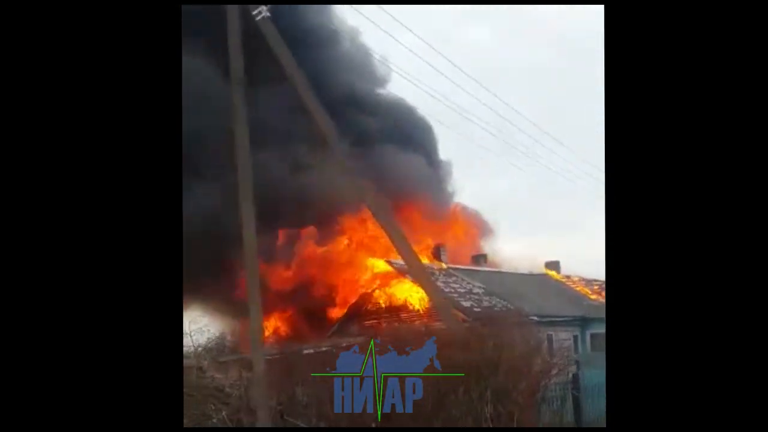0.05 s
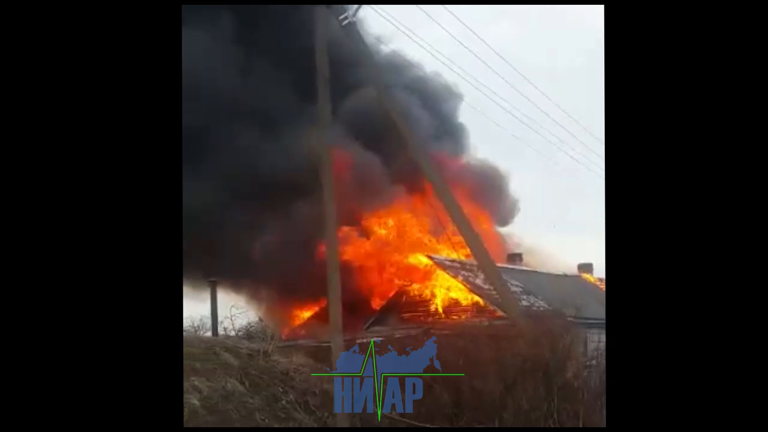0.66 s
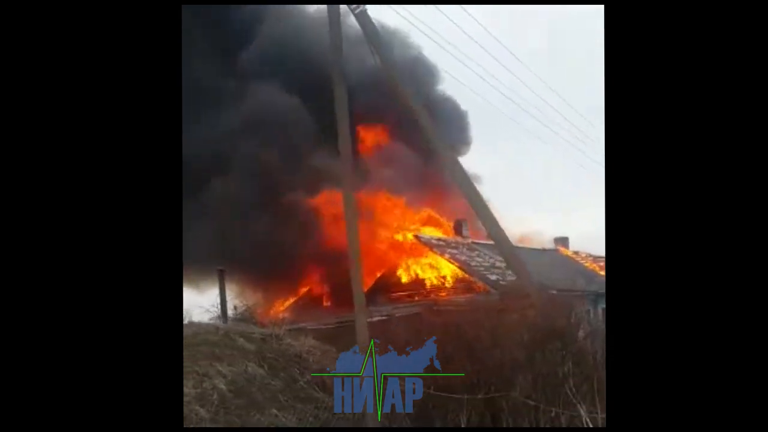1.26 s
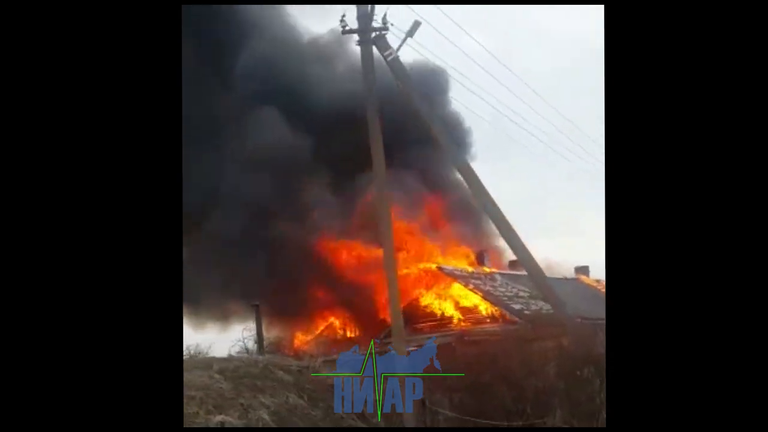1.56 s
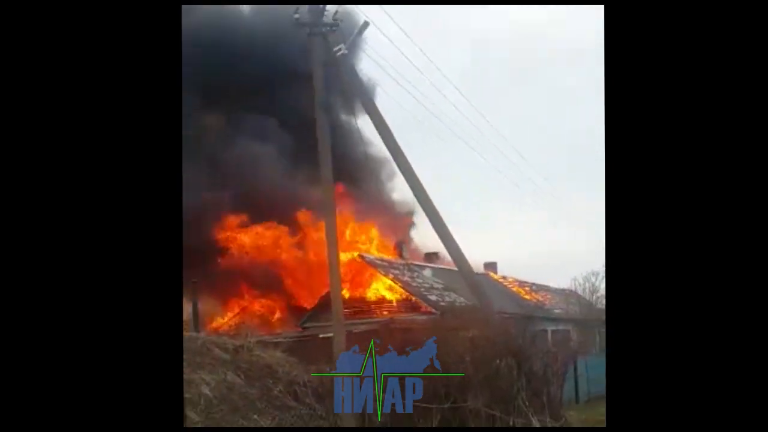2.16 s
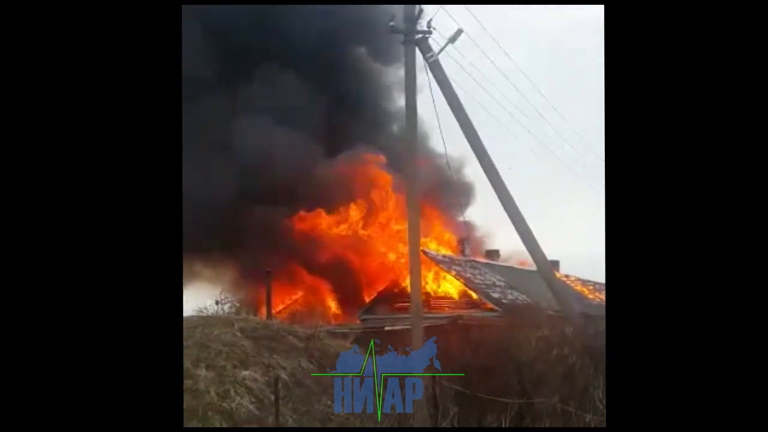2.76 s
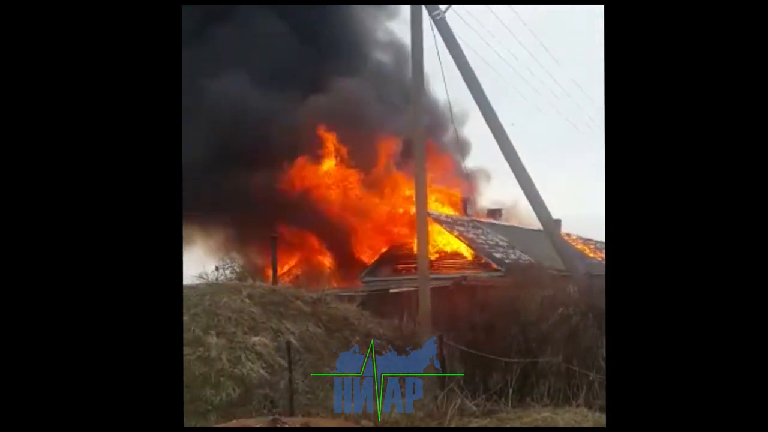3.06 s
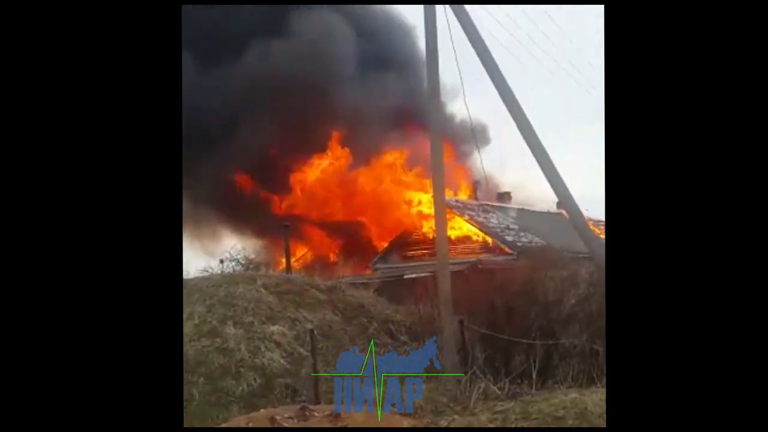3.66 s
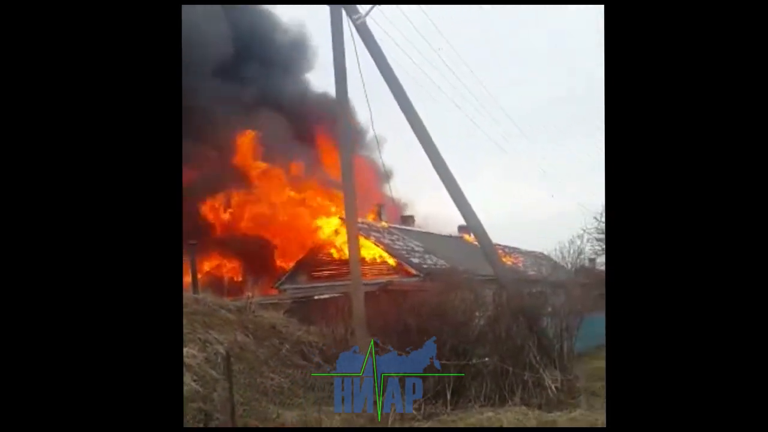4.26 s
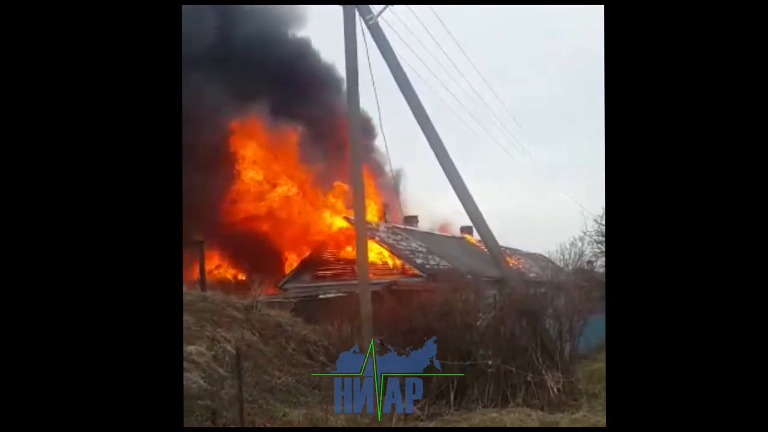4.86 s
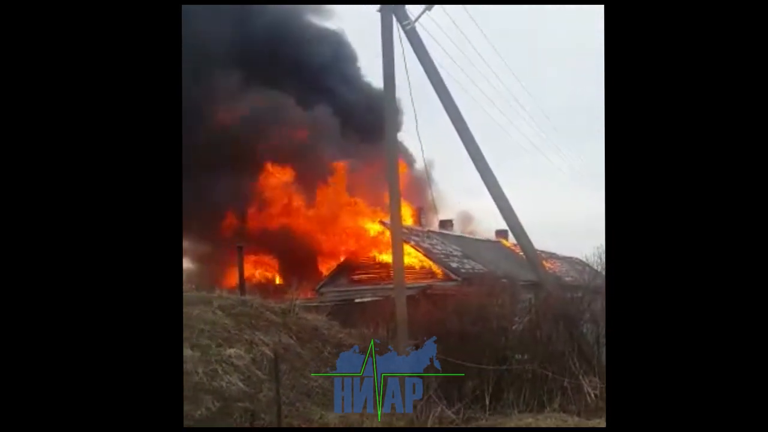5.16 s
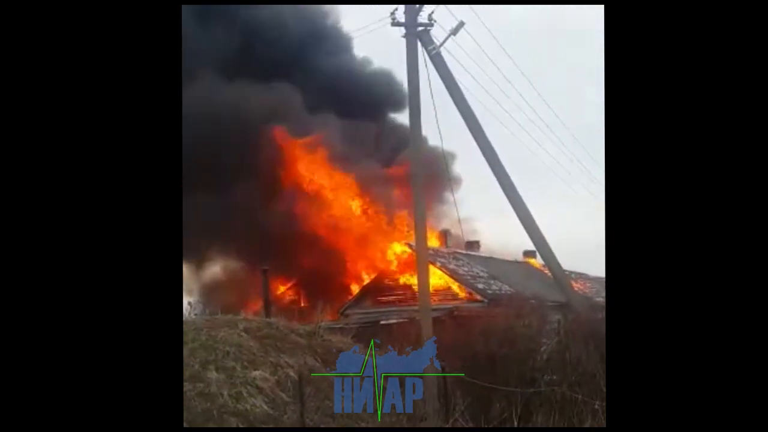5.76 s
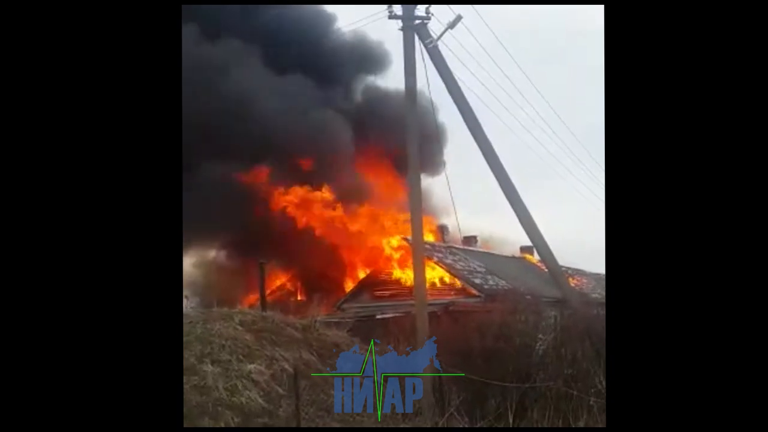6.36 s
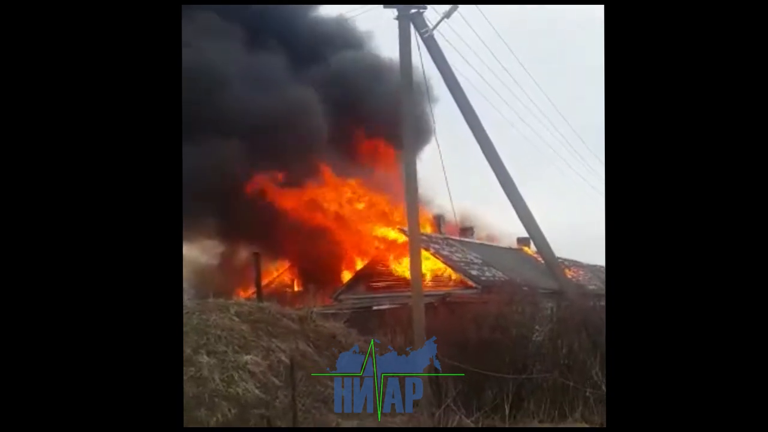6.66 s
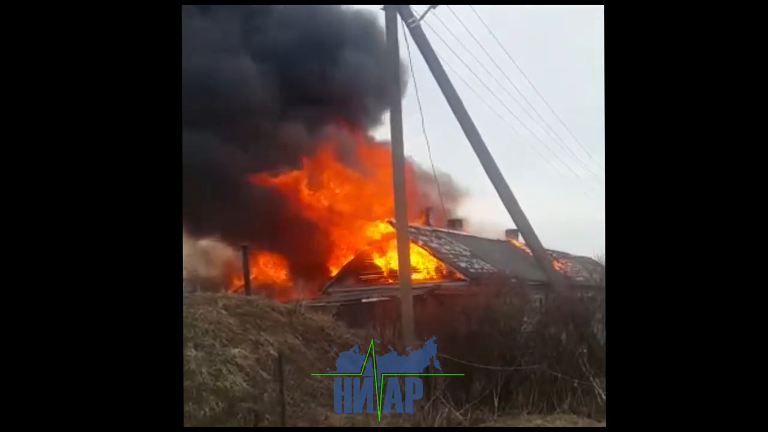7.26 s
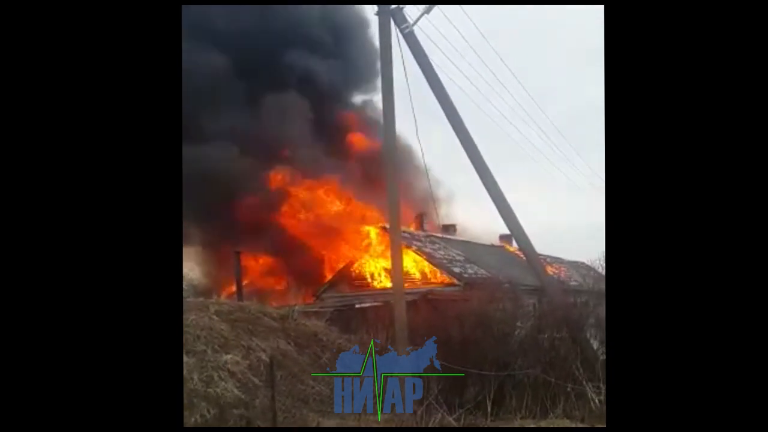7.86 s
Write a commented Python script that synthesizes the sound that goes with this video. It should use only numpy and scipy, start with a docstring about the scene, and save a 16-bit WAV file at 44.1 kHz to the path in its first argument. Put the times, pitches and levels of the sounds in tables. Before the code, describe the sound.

Irregular woody pops and sharp cracks come from a blazing house, picked up outdoors by a handheld microphone at a distance. Beneath them run constant small crackles, sizzling ticks and a soft rumble with brief puffs of air. The pops bunch into quick volleys, thin out for a moment, then return near the end with stronger hiss and a surge of flame. The yard scatters a brief echo.

```python
"""Wooden house on fire

Outdoors, some way off from a fierce blaze. Roof sheets and timbers burst with sharp, hollow pops,
splinters snap, sap spits, and crackle and hiss flare up and die away over the low roar of turbulent air.
The yard scatters each pop; a handheld camera hears it through two unlike microphone ports."""
import sys
import numpy as np
from scipy import signal
from scipy.fft import rfft, irfft, next_fast_len
from scipy.io import wavfile
from scipy.ndimage import map_coordinates

SR = 44100
rng = np.random.default_rng(int(sys.argv[2]) if len(sys.argv) > 2 else 0)


def store_wav(level_fs):
    """Save 16-bit WAV to argv[1]."""
    pcm = np.round(np.clip(np.atleast_2d(level_fs), -1, 1) * 32767)
    wavfile.write(sys.argv[1], SR, pcm.T.astype(np.int16))


N = 352800

# loud bursts of roof and timber: start_s, body_db, pitch_hz, crack_db
TIMBER_BURSTS = [(0.0491, -37, 1300, -32.5), (0.1403, -29, 786, -41), (0.1669, -19.5, 650, -36.5),
                 (0.1956, -24, 786, -29), (0.3647, -22, 1520, -25), (0.4431, -17, 710, -31),
                 (0.5344, -27, 1800, -42), (0.539, -28, 1520, -26), (0.5711, -16.5, 1020, -20.5),
                 (0.6135, -31, 1000, -41), (0.639, -27.5, 1230, -39), (0.6629, -20, 1040, -26),
                 (0.7286, -19.5, 810, -35), (0.7453, -25.5, 1130, -41), (0.8357, -26.5, 1300, -29),
                 (0.8732, -32, 1010, -63), (0.902, -36, 1170, -59), (0.9459, -37, 870, -35),
                 (1.1171, -35, 1460, -54), (1.2445, -37.5, 1810, -32.5), (1.5116, -17.5, 1230, -27),
                 (1.5176, -17.5, 860, -24.5), (1.5445, -33, 1020, -32), (1.5726, -19, 950, -34),
                 (1.5902, -22, 1270, -31.5), (1.6264, -19.5, 1180, -30), (1.7975, -25, 1260, -52),
                 (1.9092, -15.5, 750, -24.5), (1.9664, -30.5, 800, -31), (2.0799, -23.5, 1260, -25.5),
                 (2.126, -33, 1530, -25.5), (2.2926, -17, 1280, -27.5), (2.2959, -19.5, 980, -27.5),
                 (2.352, -24.5, 1120, -34.5), (2.4105, -30, 1620, -18.5), (2.4647, -22.5, 1330, -36.5),
                 (2.5777, -28, 1420, -35.5), (2.764, -16, 810, -22), (2.7715, -23, 860, -31),
                 (2.8181, -19, 960, -32), (2.9394, -23.5, 1070, -36.5), (3.0675, -36.5, 870, -61),
                 (3.139, -39, 690, -38), (3.2245, -26.5, 880, -29.5), (3.292, -24.5, 1340, -30),
                 (3.3083, -18.5, 635, -21), (3.343, -23.5, 790, -36), (3.362, -29.5, 845, -38),
                 (3.476, -24.5, 1010, -52), (3.5026, -23.5, 1580, -30), (3.5517, -28.5, 1420, -39),
                 (3.603, -34.5, 910, -49), (3.932, -27.5, 1140, -31.5), (4.1236, -18.5, 850, -25.5),
                 (4.1732, -28.5, 834, -52), (4.222, -28, 1090, -46.5), (4.4002, -16.5, 567, -21),
                 (4.4162, -25, 806, -48), (4.4725, -13, 720, -21.5), (4.5125, -22, 705, -29),
                 (4.5238, -17.5, 855, -34), (4.5529, -23, 900, -35), (4.5669, -24, 755, -36),
                 (4.5786, -20.5, 676, -31.5), (4.5979, -22.5, 960, -38), (4.6466, -19.5, 1060, -34),
                 (4.7745, -32.5, 910, -52), (4.8226, -22.5, 1550, -25.5), (4.99, -27, 1320, -34),
                 (5.008, -21.5, 1480, -20.5), (5.032, -24.5, 1290, -32), (5.0743, -25.5, 774, -25.5),
                 (5.1406, -24, 895, -36), (5.1813, -27, 1700, -39.5), (5.2624, -27.5, 2140, -22),
                 (5.3141, -29.5, 1430, -37), (5.4982, -23, 1410, -24), (5.55, -30, 1100, -46),
                 (5.6708, -31.5, 1340, -54), (5.74, -42, 1020, -30.5), (5.8026, -26.5, 1040, -52),
                 (5.9263, -26, 770, -34.5), (6.0473, -22, 560, -36), (6.2995, -50, 1930, -36),
                 (6.5396, -24, 2320, -33.5), (6.8645, -28, 1060, -36), (6.8767, -22.5, 850, -39),
                 (7.0312, -21.5, 1110, -57), (7.0911, -17.5, 1010, -24.5), (7.1977, -24.5, 1180, -21.5),
                 (7.222, -19.5, 1000, -32), (7.264, -29, 1370, -41), (7.3503, -27.5, 1420, -43),
                 (7.4105, -14.5, 547, -27), (7.5739, -14.5, 720, -22), (7.6241, -19, 920, -38),
                 (7.7488, -25.5, 1070, -33.5), (7.877, -32.5, 860, -47)]
# the clearest splinters, each ringing a little above its base: start_s, level_db, base_hz
SPLINTER_SNAPS = [(0.0886, -32, 5000), (1.061, -35, 4680), (1.262, -42, 6800), (1.2848, -39.5, 7350),
                  (1.8406, -26, 5680), (2.156, -28.5, 4870), (2.2146, -34, 4870), (2.2455, -30, 6620),
                  (2.8006, -32, 4000), (3.1834, -38, 5350), (3.206, -26, 6200), (3.726, -43, 5900),
                  (3.9216, -40.5, 5640), (4.277, -36, 4400), (4.848, -29.5, 5170), (6.3275, -41, 5860),
                  (7.1215, -26, 6310), (7.1474, -30.5, 4950), (7.2357, -30, 5050), (7.5239, -27, 4240),
                  (7.6723, -27.5, 6400), (7.7869, -35, 6080)]
# steady strength of the blaze, in relative levels: time_s, crackle_db, sizzle_db
STEADY_BLAZE = [(0.0, -38.5, -48.5), (0.18, -39.5, -45.5), (0.69, -42, -47.5), (1.2, -49, -48.5),
                (1.54, -58, -48), (1.69, -49, -43), (2.29, -37, -43.5), (2.56, -46.5, -44), (3.5, -45, -47),
                (3.72, -47, -57), (4.01, -55.5, -53), (4.52, -40, -45), (6.3, -50.5, -51),
                (6.97, -40, -35.5), (7.26, -35.5, -38), (8.0, -46.5, -47)]
# flare-ups where fresh wood is laid open, in relative levels: start_s, crackle_db, sizzle_db, t60_s
FLARE_UPS = [(0.09, -30.5, -36, 0.48), (0.53, -56, -43, 0.66), (1.51, -27, -41, 0.86),
             (1.76, -36.5, -41, 1), (1.9, -29, -37, 0.28), (2.06, -34, -35, 0.77), (2.76, -30.5, -33, 0.53),
             (3.14, -60, -50, 0.63), (3.3, -33, -53, 0.46), (3.49, -41, -41, 1), (4.12, -37.5, -43.5, 0.97),
             (4.4, -34.5, -35, 0.38), (4.48, -23.5, -35, 0.72), (5.0, -34, -62, 1),
             (5.75, -32.5, -57, 0.34), (6.528, -39, -33, 1), (6.849, -29, -55, 0.63),
             (7.06, -31, -42, 0.52), (7.399, -22.5, -28, 0.18), (7.57, -28.5, -57, 0.36)]
# pockets of sap spitting: middle_s, spread_s, level_db
SAP_POCKETS = [(1.21, 0.023, -49), (1.82, 0.036, -50), (2.15, 0.019, -40), (3.18, 0.015, -47),
               (7.15, 0.033, -47.5), (7.44, 0.013, -44)]
# slow swell of the low roar: time_s, relative_db
ROAR_SWELL = [(0.0, -60), (0.69, -49), (1.14, -61), (1.38, -54), (1.54, -48), (2.16, -45), (2.38, -57),
              (3.43, -53.5), (3.72, -57), (3.94, -58), (4.43, -47.5), (4.84, -56), (5.32, -46),
              (5.7, -54.5), (6.3, -54), (7.11, -32.5), (7.73, -60), (8.0, -63)]
# single low puffs of turbulent air: middle_s, relative_db, pitch_hz
AIR_PUFFS = [(0.159, -38, 175), (0.686, -37, 277), (.725, -39, 112), (1.398, -39.5, 258),
             (1.445, -35.5, 230), (1.71, -40.5, 199), (1.876, -36.5, 260), (2.1, -36.5, 150),
             (2.65, -31, 168), (2.719, -38.5, 120), (3.169, -41.5, 137), (4.141, -40, 201),
             (5.39, -41.5, 176), (6.362, -36, 121), (6.519, -41.5, 128), (6.88, -36, 110), (7.03, -29, 200),
             (7.11, -35, 240), (7.269, -39, 179), (7.569, -41.5, 110)]
# tone of knocked timber: frequency_hz, gain_db
TIMBER_SPECTRUM = [(60, -6.5), (200, 2), (400, 0), (580, 3.5), (720, -2), (900, 0), (1300, -3.5), (1700, 2),
                   (2100, -2), (3000, 0.5), (5000, -6.5), (10000, -44)]
# tone of cracks and ticks: frequency_hz, gain_db
CRACK_SPECTRUM = [(150, -7.5), (800, 2), (2500, 9.5), (4200, 1.5), (6500, 1), (9000, -6), (12000, -13),
                  (16000, -30)]
# low roar of the flames: frequency_hz, gain_db
ROAR_SPECTRUM = [(22, -37), (35, -18), (60, -5), (110, 1.5), (180, -2), (300, -14), (500, -38),
                 (1200, -42.5)]
# far crackle merged into a rush: frequency_hz, gain_db
RUSH_SPECTRUM = [(100, -17), (300, -10.5), (550, -8), (900, -1), (1700, -5.5), (2400, -8.5), (3500, -13),
                 (8000, -41)]
# far ticks merged into a hiss: frequency_hz, gain_db
HISS_SPECTRUM = [(800, -11), (2200, 1.5), (3200, 0.5), (4200, -6), (6000, -4), (8000, -10), (11000, -16),
                 (15500, -28)]
# decay of the yard's echo: frequency_hz, t60_s
YARD_DECAY = [(150, 0.13), (900, 0.46), (4000, 0.52), (12000, 0.22)]
# left-right likeness of scattered sound: frequency_hz, correlation (0-1)
STEREO_LIKENESS = [(200, 0.94), (700, 0.95), (1500, 0.75), (3000, 0.13), (5500, 0.21), (12000, 0)]
# colour of the left microphone port: frequency_hz, gain_db
LEFT_PORT_RESPONSE = [(100, 5.5), (2200, 0), (3200, -0.5), (4200, 6), (5400, 1.5), (7500, 7.5), (12000, 3)]
# colour of the right port, with its cavity resonance: frequency_hz, gain_db
RIGHT_PORT_RESPONSE = [(100, 6), (400, 2.5), (1500, 1.5), (2900, -1), (4300, 8.5), (5500, 10.5), (6800, 3),
                       (8500, -4), (13000, -5.5)]


def pops(crackle_db, stray_crack_db=-13, across_db=1.0):
    """Roof and timber burst: a knock with a crack on its front; those with little crack sound hollow."""
    s, db, hz = strays(crackle_db, over_db=4, scatter_db=2.5, pitch_hz=1100, pitch_scatter=0.38, count=50)
    weak = [s, db, hz, db + stray_crack_db]
    start_s, body_db, pitch_hz, crack_db = np.hstack([np.transpose(TIMBER_BURSTS), weak])
    # stronger and lower bursts ring longer and tear more
    ring_s = 0.027 * amp(0.067 * (body_db + 22.5)) * (1000 / pitch_hz) ** 0.21
    tearing = (ring_s / 0.026)[:, None]
    hollow = np.clip((body_db - crack_db - 4) / 16, 0, .75)[:, None]
    body = knocks(pitch_hz, 0.9 * ring_s, tearing, q=1.28, hollow=hollow, size=1536)
    bright_db = 0.3 * (crack_db + 36) + 0.16 * (crack_db - body_db + 12)  # strong, bare cracks: brighter
    edge_hz = np.clip(6000 * amp(bright_db), 2000, 15000)
    crack_t60_s = ring_s * (0.71 + 1.1 * hollow.ravel())  # a bare crack is over at once
    crack = fracture(crack_t60_s, (1.4 + 2.2 * hollow) * tearing, size=1536, sudden=1 - hollow)
    crack = resonant(crack, edge_hz, q=1.2, lowpass=True)
    count = len(start_s)
    board_hz = 2100 * np.exp(0.3 * rng.standard_normal(count))  # each split board has two high rings
    splinter_hz = 4300 * np.exp(0.37 * rng.standard_normal(count))
    board_ring = (0.1 + 1.6 * hollow) * resonant(crack, board_hz, q=7.7)
    splinter_ring = 0.9 * resonant(crack, splinter_hz, q=7.5)
    crack = coloured(crack + board_ring + splinter_ring, CRACK_SPECTRUM)
    pan_db = across_db * rng.standard_normal(count)  # across the width of the house
    return placed(start_s, body_db, body, pan_db) + placed(start_s, crack_db, crack, pan_db)


def fracture(t60_s, tearing, size, sudden=1):
    """One sudden break, then ever weaker tearing of fibres, scattered by the wreck; one per t60_s."""
    t = np.arange(size) / SR
    fade = amp(-60 * t / np.maximum(t60_s, .001)[:, None])
    fibres = spread(rng.standard_normal((2, len(t60_s), size))) * fade
    return sudden * (t == 0) + tearing * unit(fibres) / np.sqrt(size)


def knocks(pitch_hz, t60_s, tearing, q, hollow, size):
    """Fractures ring the piece they split; a hollow piece rings a second time, swelling and rounder."""
    ring = resonant(fracture(t60_s, tearing, size), pitch_hz, q)
    cavity = resonant(ring, pitch_hz, q=2.4)
    body = (1 - hollow) * ring + hollow * cavity
    return coloured(resonant(body, 3.4 * pitch_hz, q=0.75, lowpass=True), TIMBER_SPECTRUM)


def strays(heat_db, over_db, scatter_db, pitch_hz, pitch_scatter, count):
    """Random weaker breaks that follow the heat: start_s, level_db, pitch_hz."""
    start_s = (np.arange(count) + rng.uniform(size=count)) / count * (N - 1) / SR
    strength, detune = np.clip(rng.standard_normal((count, 2)), -2, 2).T
    level_db = heat_db[(start_s * SR).astype(int)] + over_db + scatter_db * strength
    return start_s, level_db, pitch_hz * np.exp(pitch_scatter * detune)


def snaps(sizzle_db):
    """Splinters break with a crisp tick and ring very briefly."""
    weak = strays(sizzle_db, over_db=0.5, scatter_db=2, pitch_hz=6300, pitch_scatter=0.12, count=30)
    start_s, level_db, base_hz = np.hstack([np.transpose(SPLINTER_SNAPS), weak])
    ticks = fracture(np.full(len(start_s), .006), tearing=1.3, size=1024)
    ring = resonant(ticks, 1.15 * base_hz, q=3.7)
    edge = resonant(ticks, 1.9 * base_hz, q=2.1)
    return placed(start_s, level_db, coloured(ring + 0.6 * edge, CRACK_SPECTRUM))


def heat(column, steady_db, flare_db, catch_s=0.015):
    """Level in dB of crackle (column 1) or sizzle (2): steady blaze plus flare-ups that catch and fade."""
    rows = np.array(FLARE_UPS)
    time_s = np.arange(0, N, 64) / SR
    age_s = np.maximum(time_s[:, None] - rows[:, 0], 0)
    catching = 1 - np.exp(-age_s / catch_s)
    flares = amp(rows[:, column] + flare_db - 60 * age_s / rows[:, -1]) * catching
    flare_power = np.interp(np.arange(N) / SR, time_s, np.sum(flares ** 2, axis=1))
    steady_power = amp(curve(STEADY_BLAZE, column) + steady_db) ** 2
    return 10 * np.log10(steady_power + flare_power)


def crackle(crackle_db, count=800):
    """Countless small bursts deep in the house, a few of them stronger."""
    start_s = rng.uniform(0, (N - 1) / SR, count)
    pitch_hz = np.clip(1250 * np.exp(0.47 * rng.standard_normal(count)), 300, 4000)
    extra_db = np.minimum(4.8 * rng.exponential(size=count), 14)
    level_db = crackle_db[(start_s * SR).astype(int)] - 9.5 + extra_db
    bursts = knocks(pitch_hz, np.full(count, .014), tearing=2.2, q=2.5, hollow=.5, size=512)
    return placed(start_s, level_db, bursts)


def sizzle(sizzle_db, count=1400):
    """Tiny pockets of steam and resin tick in clusters, each at its own pitch."""
    start_s = rng.uniform(0, (N - 1) / SR, count)
    pitch_hz = 6300 * np.exp(0.54 * rng.standard_normal(count))
    cluster_db = sizzle_db + 2.9 * wobble(5)
    extra_db = np.minimum(4.26 * rng.exponential(size=count), 15)
    level_db = cluster_db[(start_s * SR).astype(int)] - 14.0 + extra_db
    ticks = resonant(fracture(np.full(count, .005), tearing=2.5, size=256), pitch_hz, q=1.9)
    return placed(start_s, level_db, coloured(ticks, CRACK_SPECTRUM))


def sap_spits(ticks_each=16):
    """Each pocket of sap spits a quick string of very fine ticks."""
    middle_s, spread_s, level_db = np.repeat(SAP_POCKETS, ticks_each, axis=0).T
    count = len(middle_s)
    lag, strength = rng.standard_normal((count, 2)).T
    ticks = fracture(np.full(count, .004), tearing=0.56, size=256)
    ticks = resonant(ticks, hz=rng.uniform(6100, 17000, count), q=3.0)
    return placed(middle_s + spread_s * lag, level_db + 3 * strength, coloured(ticks, CRACK_SPECTRUM))


def flames(crackle_db, sizzle_db):
    """Turbulent air roars in lumps, partly right at the ports; far crackle merges into rush and hiss."""
    lumps = amp(4.1 * wobble(24)) * coloured(rng.standard_normal((3, N)), ROAR_SPECTRUM)
    at_ports = [[1.5], [3.0]] * lumps[:2]
    roar = unit(lumps[-1] + at_ports) * amp([[-2.2], [1.5]])  # stronger on the right
    roar *= amp(curve(ROAR_SWELL, column=1) + 1.5)
    rush = scattered_noise(RUSH_SPECTRUM) * amp(crackle_db - 2.5 + 1.76 * wobble(35))
    hiss_db = sizzle_db + 0.094 * (sizzle_db - sizzle_db.mean())  # in a flare-up the ticks merge into hiss
    hiss = scattered_noise(HISS_SPECTRUM) * amp(hiss_db - 2.5 + 1.7 * wobble(54))
    return roar + rush + hiss


def puffs(width_s=0.016, size=6144):
    """Lumps of turbulent air swell and fade in a few hundredths of a second, stronger at the right port."""
    middle_s, relative_db, pitch_hz = np.transpose(AIR_PUFFS)
    t = (np.arange(size) - size / 2) / SR
    swell = np.exp(-.5 * (t / width_s) ** 2)
    air = resonant(rng.standard_normal((3, len(middle_s), size)), pitch_hz, q=1.5)
    air = air[-1] + air[:2]  # one shared part, one at each port
    air = resonant(air, 2 * pitch_hz, q=0.56, lowpass=True) * swell
    return placed(middle_s + t[0], relative_db + 3.5, air) * amp([[-2], [1.5]])


def whistle(start_s=6.63, end_s=6.87, from_hz=790, to_hz=670, level_db=-50):
    """A thin, faint whistle slides down once."""
    progress = np.clip((np.arange(N) / SR - start_s) / (end_s - start_s), 0, 1)
    pitch_hz = from_hz + (to_hz - from_hz) * progress
    return amp(level_db) * np.sin(np.pi * progress) * np.sin(2 * np.pi * np.cumsum(pitch_hz) / SR)


def yard_echo(x, wet_db, clump_db, stretches=16):
    """Walls, fences and brush scatter a lumpy echo, different for each stretch of time."""
    out = np.zeros((2, N + SR))
    for part in np.array_split(np.arange(N), stretches):
        hz, t, noise = signal.stft(rng.standard_normal((2, SR // 2)), SR, nperseg=256)
        decay_db = -60 * t / along(YARD_DECAY, hz)[:, None]
        gain = amp(decay_db + clump_db * rng.standard_normal(len(t)))
        tail = spread(signal.istft(noise * gain, SR, nperseg=256)[1])
        echo = signal.fftconvolve(x[:, part], tail / np.linalg.norm(tail[0]), axes=1)
        out[:, part[0]:part[0] + echo.shape[1]] += echo
    return amp(wet_db) * out[:, :N]


def scattered_noise(spectrum):
    """Coloured noise arriving from all around, at rms 1."""
    return unit(spread(coloured(rng.standard_normal((2, N)), spectrum)))


def spread(pair):
    """Two unrelated signals become left and right of a scattered sound."""
    n = pair.shape[-1]
    likeness = np.clip(along(STEREO_LIKENESS, np.fft.rfftfreq(n, 1 / SR)), 0, 1)
    turn = np.arccos(likeness) / 2
    mid = irfft(rfft(pair[0]) * np.cos(turn), n)
    side = irfft(rfft(pair[1]) * np.sin(turn), n)
    return np.array([mid + side, mid - side])


def placed(start_s, level_db, waves, pan_db=0):
    """Sum short stereo waves at their starts; level_db is rms over 8 ms, pan_db leans each to the left."""
    size = waves.shape[-1]
    gain = amp([level_db + pan_db, level_db - pan_db])[..., None]
    scaled = unit(waves) * gain * np.sqrt(.008 * SR / size)
    index = np.round(np.abs(start_s) * SR).astype(int)[:, None] + np.arange(size)
    return np.array([np.bincount(index.ravel(), side.ravel(), N + size)[:N] for side in scaled])


def resonant(waves, hz, q, lowpass=False):
    """Each row through its own two-pole band-pass or low-pass."""
    size = waves.shape[-1]
    s = 1j * np.fft.rfftfreq(2 * size, 1 / SR) / hz[:, None]
    response = (1 if lowpass else s / q) / (1 + s / q + s * s)
    return irfft(rfft(waves, 2 * size) * response)[..., :size]


def coloured(x, spectrum):
    """Causal filter through points of frequency_hz, gain_db."""
    n = x.shape[-1]
    padded = 2 * next_fast_len(n // 2 + min(n, 4096))
    gain = amp(along(spectrum, np.fft.rfftfreq(padded, 1 / SR)))
    cepstrum = irfft(np.log(gain))
    cepstrum[1:padded // 2] *= 2  # fold to minimum phase
    cepstrum[padded // 2 + 1:] = 0
    return irfft(rfft(x, padded) * np.exp(rfft(cepstrum)), padded)[..., :n]


def along(points, hz):
    """Points of frequency_hz, value, joined on a log frequency axis."""
    frequency_hz, value = np.transpose(points)
    return np.interp(np.log(hz + 1), np.log(frequency_hz + 1), value)


def curve(rows, column):
    """One column of a table led by time_s, for every sample."""
    rows = np.array(rows)
    return np.interp(np.arange(N) / SR, rows[:, 0], rows[:, column])


def wobble(rate_hz):
    """A smooth random curve, rate_hz knots a second."""
    knots = rng.standard_normal(int(N * rate_hz / SR) + 4)
    return map_coordinates(knots, [np.arange(N) * rate_hz / SR])


def unit(x):
    """Each row at rms 1."""
    return x / np.sqrt(np.mean(x ** 2, axis=-1, keepdims=True) + 1e-20)


def amp(db):
    """Decibels to amplitude."""
    return 10 ** (np.asarray(db) / 20)


def scene():
    """Across the yard: one heat drives small bursts, crackle and hiss; pops and snaps echo."""
    crackle_db = heat(column=1, steady_db=-2.0, flare_db=1)
    sizzle_db = heat(column=2, steady_db=-0.5, flare_db=1.7)
    bursts = pops(crackle_db) + snaps(sizzle_db)
    echo = yard_echo(bursts, wet_db=-11.5, clump_db=6.5)
    bed = crackle(crackle_db) + sizzle(sizzle_db) + flames(crackle_db, sizzle_db)
    return bursts + echo + bed + sap_spits() + puffs() + whistle()


def record(dry):
    """Each microphone port colours the sound, the right hears it a little later; loud peaks saturate."""
    ceiling, low_cut_hz, top_hz = .95, 38, 15900
    left = coloured(dry[0], LEFT_PORT_RESPONSE)
    right = coloured(np.pad(dry[1], (2, 0))[:N], RIGHT_PORT_RESPONSE)
    ports = np.array([left, right])
    saturated = ports / (1 + (ports / ceiling) ** 6) ** (1 / 6)
    hz = np.fft.rfftfreq(N, 1 / SR)
    low_cut = 1 / np.sqrt(1 + (low_cut_hz / (hz + 1)) ** 6)
    return irfft(rfft(saturated) * low_cut * (hz < top_hz), N)


dry = scene()
out = record(dry)
store_wav(out)
```